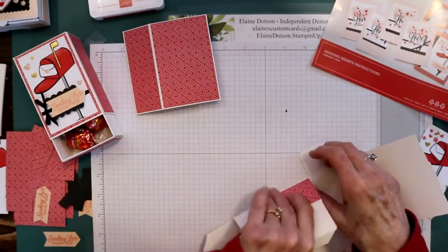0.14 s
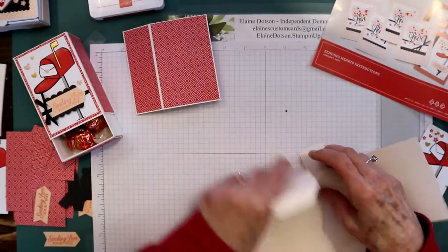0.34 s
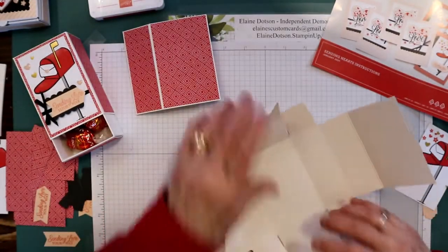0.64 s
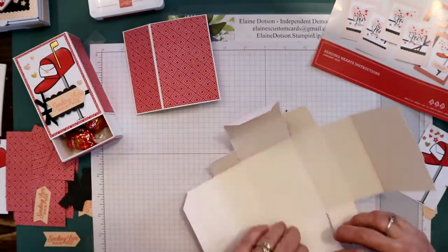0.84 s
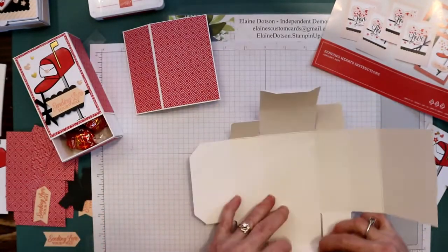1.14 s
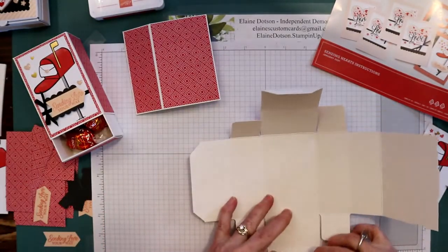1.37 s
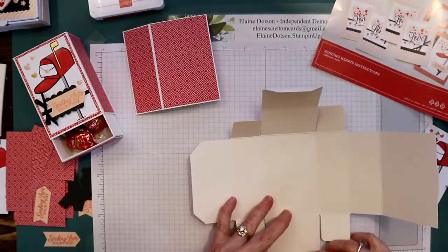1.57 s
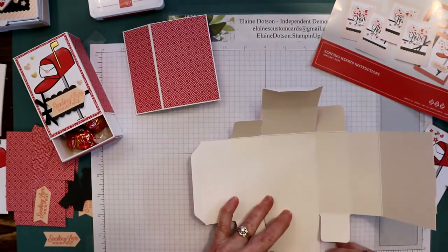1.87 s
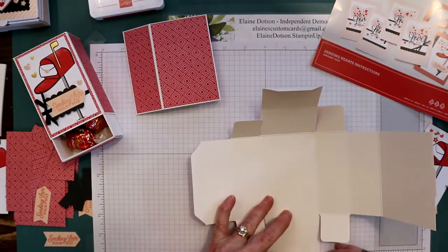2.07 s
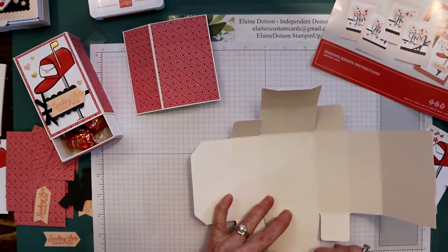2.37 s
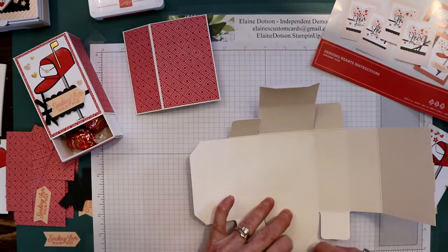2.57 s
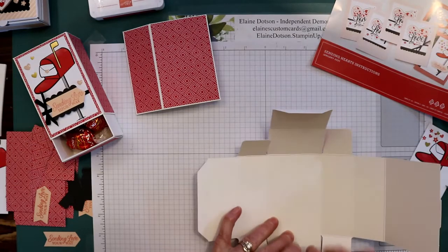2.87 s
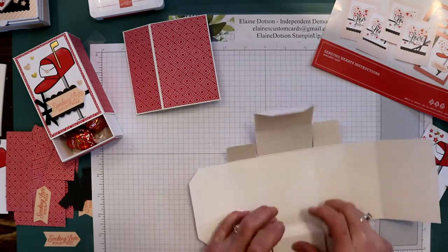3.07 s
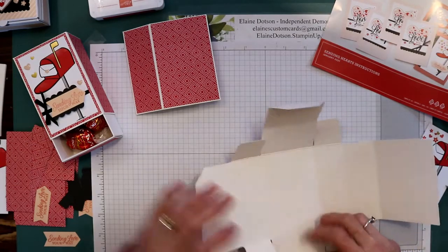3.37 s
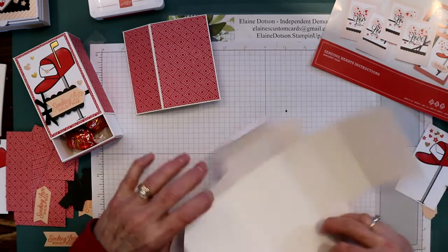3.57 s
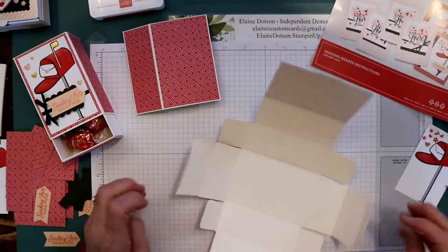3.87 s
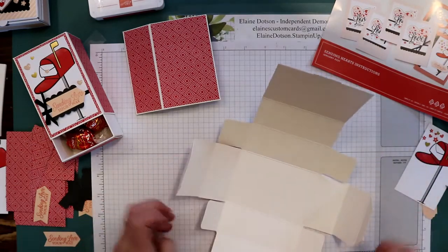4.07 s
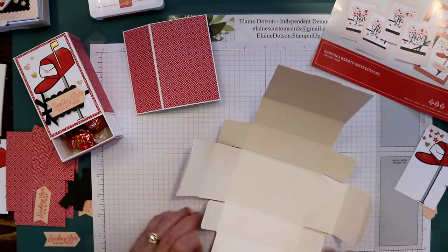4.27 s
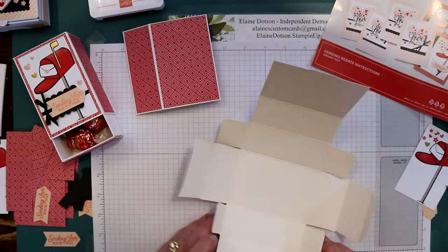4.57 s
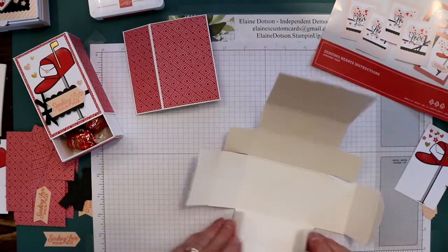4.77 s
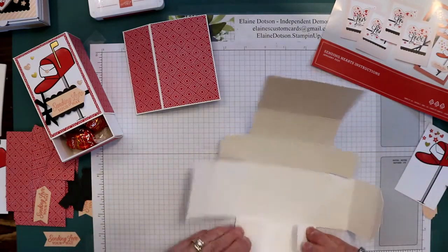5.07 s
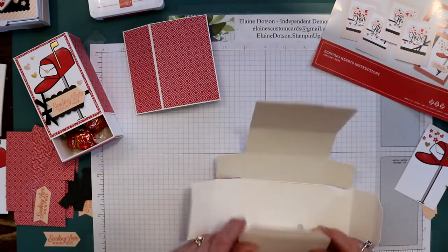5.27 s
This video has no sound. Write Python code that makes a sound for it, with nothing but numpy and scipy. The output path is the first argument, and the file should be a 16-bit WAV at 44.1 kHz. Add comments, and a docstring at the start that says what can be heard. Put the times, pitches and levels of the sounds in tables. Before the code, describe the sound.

A creased sheet of stiff card is moved on a work mat, heard close and nearly mono in a small, quiet room with faint air, hum and hiss. At 0.1 seconds a short rustle, pat and low puff of air open the scene, followed by faint brushing to 0.5. Between 0.8 and 1.25 the card slides and turns, with dry clicks and a clear tap at 1.2. Soft flutters and rubs follow, then mostly stillness, with a tiny brush near 1.95 and a faint tap at 2.4. From 2.6 activity thickens: a bright click at 2.73, scrapes and crease pops, then the loudest sharp snap at 3.07. More scraping and clicks at 3.25 to 3.45 lead to a firm, dull slap with edge scrape at 3.6. A tiny high squeaking tick comes at 4.17. Light taps and gentle sliding return from 4.77 to the end, around 5.4.

```python
"""A creased sheet of cardstock hisses as it is slid, unfolded and turned on a work mat in a small room.
Fibre slips make the hiss and crackle; creases snap and flaps tap as clicks with fluttering bending waves;
panels pat down as filtered noise, edges scrape as noisy slips and squeak as short unsteady tones.
Panels push low swinging puffs of air and the desk rumbles under the arm. Short reflections,
quiet air, hum and faint stereo hiss surround a close, nearly mono pickup."""
import sys
import numpy as np
from scipy import signal
from scipy.fft import rfft, irfft
from scipy.io import wavfile
from scipy.ndimage import uniform_filter1d

SR = 44100
rng = np.random.default_rng(int(sys.argv[2]) if len(sys.argv) > 2 else 0)


def generate_wav(signal):
    """Clip the signal to [-1, 1] and save it as 16-bit WAV at the path in sys.argv[1]."""
    frames = np.transpose(np.atleast_2d(signal))
    scaled = np.clip(frames, -1, 1) * 32767
    pcm = np.round(scaled).astype(np.int16)
    wavfile.write(sys.argv[1], SR, pcm)


N = 239446
TIME = np.arange(N) / SR
BINS = np.fft.rfftfreq(2048, 1 / SR) + 1  # Hz, offset to keep logs finite

# pushes of the sheet over the mat: (time of greatest speed [s], hiss level before slide gain [dB],
# sheet rise [s], sheet fall [s], arm rumble level [dB])
STROKES = [(.095, -46.5, 0.039, 0.065, -54), (.26, -56, 0.031, 0.051, -56), (.45, -56, 0.13, .095, -67.5),
           (.98, -52.5, 0.092, 0.097, -59), (1.17, -58.5, 0.052, 0.058, -71),
           (1.41, -53.5, .036, 0.041, -66), (1.65, -60.5, 0.025, 0.042, -57),
           (1.962, -49.5, 0.011, 0.019, -67), (2.435, -56, 0.063, .035, -54.5),
           (2.625, -52, 0.024, 0.057, -56), (2.69, -48.5, 0.053, .055, -63),
           (2.985, -47, 0.034, .07, -51.5), (3.255, -53.5, .022, .045, -61), (3.45, -49, 0.037, 0.049, -59),
           (3.61, -55, .08, .15, -64), (4.82, -65, .04, 0.085, -60), (5.135, -51, 0.13, 0.073, -64),
           (5.28, -60, 0.034, 0.043, -57), (5.42, -62, 0.034, .05, -56)]
STROKE_SHAPE = 1.07  # 1 = pointed swell of speed, 2 = rounded


def amp(db):
    """Decibels to gain."""
    return 10 ** (np.asarray(db) / 20)


def evened(x):
    """Scales to rms 1."""
    return x / np.sqrt(np.mean(x ** 2) + 1e-20)


def read(points, hz):
    """Interpolates a table on a log-frequency axis."""
    f, value = np.transpose(points)
    return np.interp(np.log(hz + 1), np.log(f + 1), value)


def add(mix, s, sound):
    """Mixes a sound in at time s."""
    part = mix[max(round(s * SR), 0):][:len(sound)]
    part += sound[:len(part)]


def coloured(x, points):
    """Gives an N-sample signal a spectrum, at rms 1."""
    gain = amp(read(points, np.fft.rfftfreq(N, 1 / SR)))
    return evened(irfft(rfft(x) * gain, N))


def smoothed_noise(shape, *passes):
    """Gaussian noise at rms 1 after moving averages, each given as (size, axis)."""
    x = rng.standard_normal(shape)
    for size, axis in passes:
        x = uniform_filter1d(x, size=size, axis=axis)
    return evened(x)


def swell(t, rise_s, fall_s, shape):
    """Grows to 1 at t = 0 and dies away; rise and fall are 1/e times."""
    return np.exp(-abs(t / np.where(t < 0, rise_s, fall_s)) ** shape)


def ring(db):
    """Minimum-phase impulse response of energy 1 with the given dB shape on BINS."""
    log_gain = np.log(amp(np.r_[db, db[-2:0:-1]]))
    response = np.fft.ifft(np.exp(np.conj(signal.hilbert(log_gain)))).real[:len(BINS)]
    return response / np.linalg.norm(response)


def card(centre_hz, focus_db, baffle=0.33):
    """Card resonances in dB under a hump set by the moving part; small parts radiate little bass."""
    # card resonances: (freq [Hz], width [Hz], level [dB])
    resonances = [(425, 94, 5), (663, 200, 7.5), (995, 120, 6.5), (1280, 61, 3), (1650, 330, 1.5),
                  (2280, 800, 3.5), (3180, 82, 2.5), (5200, 610, 2), (5750, 99, 5), (7630, 460, 5.5)]
    modes = sum(db / (1 + (2 * (BINS - hz) / width_hz) ** 2) for hz, width_hz, db in resonances)
    leak = -10 * np.log10(1 + (baffle * centre_hz / (BINS + 50)) ** 4)
    hump = -focus_db * (np.hypot(1, np.log2(BINS / centre_hz)) - 1)
    return modes + leak + hump


def fibres(size, per_s, spread_db, smooth):
    """Tiny slips of unequal size over a smooth rub, at rms 1."""
    sizes = amp(spread_db * np.minimum(rng.exponential(1, size), 4))
    slips = (rng.random(size) < per_s / SR) * sizes
    signed = evened(slips * rng.choice([-1, 1], size))
    return evened(signed + smooth * rng.standard_normal(size))


def shifting(x, patch_db):
    """As the contact moves, narrow bands of the sheet swell and fade."""
    z = signal.stft(x, nperseg=512, noverlap=384)[2]
    patches = smoothed_noise(z.shape, (4, 0), (9, 1))
    return evened(signal.istft(z * amp(patch_db * patches), nperseg=512, noverlap=384)[1][:N])


def background(quiet_db=-64.5, hum_hz=122, hum_db=-86, side_db=-71):
    """Room air, a faint hum and microphone hiss: coloured noise and a sine, as mid and side."""
    # mid noise spectrum: (freq [Hz], relative level [dB])
    air_points = [(12, -10), (22, 2.5), (42, -3), (85, 2), (160, -2.5), (350, -3), (800, -8), (1500, -10),
                  (3200, -12.5), (8000, -15), (16000, -16)]
    # spectrum of the hiss that differs between the ears: (freq [Hz], relative level [dB])
    side_points = [(12, -45), (20, -21), (63, -9.5), (542, 3.5), (642, 2), (1190, -4), (11400, -2.5),
                   (16000, -0.5)]
    mid, side = rng.standard_normal((2, N))
    hum = amp(hum_db) * np.sin(2 * np.pi * hum_hz * TIME)
    return amp(quiet_db) * coloured(mid, air_points) + hum, amp(side_db) * coloured(side, side_points)


def room(x, delay_s=0.0033):
    """Sparse reflections from desk and walls, each band dying at its own speed."""
    # decay by band: (freq [Hz], t60 [s])
    decay_points = [(100, 0.77), (400, 0.072), (1000, 0.22), (3500, 0.26), (8000, 0.22), (15000, 0.33)]
    size = SR // 2
    hits = rng.choice([-1., 1.], size) * (rng.random(size) < 4000 / SR)
    taps = hits * (np.arange(size) / SR > delay_s)
    hz, t, z = signal.stft(taps, SR, nperseg=256)
    decay = amp(-60 * t / read(decay_points, hz)[:, None])
    tail = signal.istft(z * decay, SR, nperseg=256)[1]
    return signal.fftconvolve(x, tail / np.linalg.norm(tail))[:N]


def hands(arm_stretch=1.82):
    """The desk rumbles under the arm, whose moves last arm_stretch times longer than the sheet's."""
    # rumble spectrum: (freq [Hz], relative level [dB])
    rumble_points = [(20, 0.0), (45, -15), (72, 6.5), (110, -9.5), (170, -7.0), (350, -20.5), (2000, -37)]
    rumble = coloured(rng.standard_normal(N), rumble_points)
    moves = [amp(db) * swell((TIME - s) / arm_stretch, rise_s, fall_s, STROKE_SHAPE)
             for s, _, rise_s, fall_s, db in STROKES]
    return np.linalg.norm(moves, axis=0) * rumble


def puffs(sag=0.18, wobble=0.17, flex_hz=165, flex_db=-11, damping=0.62):
    """A panel swings unevenly for a few cycles, slowing as it settles, and flexes in a second mode."""
    # air pushed by a swinging panel: (start [s], swing level before fades [dB], mean freq [Hz], length [s])
    swings = [(.081, -35.5, 78, 0.06), (.923, -52, 65, 0.07), (.987, -36.5, 82, 0.058),
              (1.428, -50, 109, 0.078), (1.484, -43.5, 161, 0.033), (1.543, -44.5, 164, .029),
              (1.574, -47.5, 170, 0.034), (2.6, -47, 73.6, 0.07), (2.726, -38, 100, .053),
              (3.014, -41, 73, .055), (3.049, -36.5, 96, 0.0337), (3.079, -44.5, 116, 0.052),
              (3.375, -38.5, 79, 0.062), (3.61, -40, 79, 0.049)]
    out = np.zeros(N)
    for s, db, hz, length_s in swings:
        u = np.arange(0, 1, 1 / (length_s * SR))
        unsteady = 1 + wobble * smoothed_noise(len(u), (200, 0))
        angle = 2 * np.pi * np.cumsum(unsteady + sag * (.5 - u)) / SR
        flex = amp(flex_db) * np.sin(flex_hz * angle + 2 * np.pi * rng.random())
        fade = signal.windows.tukey(len(u), .5) * np.exp(-damping * u)
        add(out, s, amp(db) * (flex - np.sin(hz * angle)) * fade)
    return out


def squeaks(glide=0.092, jitter=0.048, rough=0.11):
    """An edge catches and lets go at a nearly regular, falling rate for a few milliseconds."""
    # stick-slip squeaks: (start [s], tone peak level [dB], mean freq [Hz], length [s])
    slips = [(2.975, -31.5, 1830, 0.006), (2.995, -39, 4900, 0.0087), (3.242, -42, 1330, 0.01),
             (4.1628, -25, 4250, 0.0069), (4.18, -29.5, 3740, 0.0057)]
    out = np.zeros(N)
    for s, db, hz, length_s in slips:
        u = np.arange(0, 1, 1 / (length_s * SR))
        unsteady = smoothed_noise(len(u), (12, 0))
        turns = np.cumsum(hz * (1 + glide * (.5 - u) + jitter * unsteady)) / SR
        tone = np.sin(2 * np.pi * turns) + rough * rng.standard_normal(len(u))
        add(out, s, amp(db) * np.sin(np.pi * u) ** 2 * tone)
    return out


def scrapes(focus_db=10.5, ripple_db=3.0, edge_db=6, edge_octaves=0.28, gain_db=-1):
    """Uneven slips of an edge swell, fade and chatter on, ringing the flap that carries it."""
    # edge dragged or flicked over mat or flap:
    # (time of strongest drag [s], level before gain_db [dB], fall [s], edge pitch [Hz])
    drags = [(.077, -52, 0.0073, 1320), (.105, -65, 0.043, 540), (.366, -57, .004, 850),
             (.43, -60, .055, 8000), (.465, -55, .004, 900), (.855, -58.5, 0.037, 1350),
             (1.091, -54.5, 0.0077, 4270), (1.227, -52, 0.033, 1170), (1.39, -61, 0.04, 1350),
             (1.655, -60.5, 0.024, 860), (1.962, -54, .014, 840), (2.743, -43, 0.018, 1080),
             (2.953, -47.5, .028, 880), (2.978, -46.5, .016, 1830), (2.998, -44, .013, 1000),
             (3.0718, -28.5, .0012, 1100), (3.089, -47.5, .017, 1700), (3.169, -55, .006, 1330),
             (3.267, -41.5, .02, 1330), (3.448, -45, 0.025, 1100), (3.607, -30.5, .004, 730),
             (3.6066, -27.5, .002, 2400), (3.701, -52, 0.021, 2550), (4.1637, -36.5, 0.00095, 8700),
             (4.171, -44.5, 0.0045, 2750), (4.182, -45, 0.0037, 2500), (4.308, -61, .011, 2620),
             (4.819, -55, .005, 1800), (5.086, -56, .003, 1900), (5.105, -57.5, .02, 983),
             (5.27, -63, 0.18, 1950), (5.291, -53, .008, 980)]
    rise_share = .7  # rise time / fall time
    chatter_db, chatter_lag_s, chatter_s = -14.5, .017, 0.011
    out = np.zeros(N)
    for s, db, fall_s, hz in drags:
        rise_s = rise_share * fall_s
        start = max(s - 3 * rise_s, 0)
        t = np.arange(start - s, chatter_lag_s + 3 * max(fall_s, chatter_s), 1 / SR)
        edge = edge_db * np.exp(-(np.log2(BINS / hz) / edge_octaves) ** 2)
        # each grip shifts the fine peaks of the flap
        grip = smoothed_noise(len(BINS), (4, 0), (4, 0))
        body = ring(card(hz, focus_db) + edge + ripple_db * grip)
        chatter = amp(chatter_db) * swell(t - chatter_lag_s, rise_share * chatter_s, chatter_s, 1.5)
        drag = np.hypot(swell(t, rise_s, fall_s, 2.05), chatter)
        slips = fibres(len(t), per_s=1100, spread_db=2.5, smooth=0.46)
        rasp = drag * signal.fftconvolve(slips, body)[:len(t)]
        add(out, start, amp(db + gain_db) * rasp * np.linalg.norm(drag) / np.linalg.norm(rasp))
    return out


def slaps(rise_s=0.00054, settle_share=.2, settle_s=0.025):
    """Dull, dying pats of card on the mat; the rest of the panel settles in a second decay."""
    # panel landing flat: (start [s], level [dB], main decay [s])
    landings = [(.075, -43.5, 0.026), (.522, -57, 0.016), (.857, -48.5, 0.017), (1.037, -47, .0043),
                (1.197, -48, 0.0032), (1.64, -58.5, 0.024), (2.43, -60.5, 0.058), (2.704, -45.5, 0.016),
                (2.727, -40, 0.018), (2.937, -45.5, 0.014), (3.6035, -29, .007), (3.705, -54, .015),
                (4.165, -47, 0.0078), (4.794, -55.5, .058), (5.286, -54, .04)]
    # pat spectrum: (freq [Hz], relative level [dB])
    pat_points = [(60, -26), (130, -5.5), (330, -1.5), (500, 0.5), (720, -3.5), (1100, -12.5), (2400, -21),
                  (5000, -22), (15000, -75)]
    out, t = np.zeros(N), np.arange(SR // 5) / SR
    body = ring(read(pat_points, BINS))
    for s, db, decay_s in landings:
        fade = (1 - settle_share) * np.exp(-t / decay_s) + settle_share * np.exp(-t / settle_s)
        push = fade * (1 - np.exp(-t / rise_s))
        pat = signal.fftconvolve(push * rng.standard_normal(len(t)), body)
        add(out, s, amp(db) * pat * np.linalg.norm(push) / np.linalg.norm(pat))
    return out


def snaps(focus_db=3.5, flutter_s=0.0023, flutter_tilt_db=1.0, contact_s=0.00053, smear=0.34,
          soft_hz=6300, onset_s=.0015, gain_db=-1):
    """A sharp contact, then brighter bending waves that flutter out through the sheet."""
    # creases snapping, flaps tapping: (time before onset_s [s], click peak level before gain_db [dB],
    # centre freq [Hz], tilt [dB/octave], flutter level re contact [dB])
    # onset_s: a short fixed delay before each click
    contacts = [(.011, -32, 850, -1, -2.5), (.074, -30, 4110, 8, -6), (.363, -42.5, 802, -4, -11),
                (.519, -41, 1010, -3.5, 2.5), (.823, -39, 1280, -2, -2), (.862, -37.5, 1550, 2, 1),
                (.982, -33.5, 4210, 3.5, -4), (1.036, -31.5, 972, -.5, -13), (1.195, -24, 1260, -3, -20),
                (1.334, -37, 993, 2, -14), (1.545, -46.5, 2340, -1.5, 4), (2.434, -40, 1030, 12, -2),
                (2.605, -38.5, 1990, 1.5, 5.5), (2.703, -30, 5300, -4, -16), (2.725, -19, 4500, 2.5, -4.5),
                (2.732, -23.5, 1000, 4, -10), (2.921, -34.5, 1270, -2.5, 0), (2.937, -28.5, 960, 3.5, 0),
                (2.961, -33.5, 1240, -8.5, -13), (2.974, -24.5, 1900, 12, -1), (3.07, -10.5, 2500, 0, -4.5),
                (3.265, -33.5, 1230, 12, 8), (3.374, -40.5, 1430, 0.5, 1.5), (3.424, -30, 2370, -2, -2),
                (3.455, -24.5, 1000, -.5, -2), (4.164, -36, 4230, -1.5, -2), (4.769, -35.5, 1750, -3.5, -3),
                (4.814, -43, 886, 1, -8), (5.082, -34, 1100, -3, 1), (5.282, -37, 930, -5.5, -3.5),
                (5.337, -35.5, 1090, -6, -13)]
    out, t = np.zeros(N), np.arange(len(BINS)) / SR
    softness = -10 * np.log10(1 + (BINS / soft_hz) ** 8)
    decays_s = np.array([[contact_s], [flutter_s]])
    for s, db, hz, tilt_db, flutter_db in contacts:
        octaves = np.log2(BINS / hz)
        colour = card(hz, focus_db) + tilt_db * octaves
        click, bending = ring(colour + softness), ring(colour + flutter_tilt_db * octaves)
        grit, flutter = rng.standard_normal((2, len(t))) * t * np.exp(-t / decays_s)
        contact = signal.fftconvolve((t == 0) + smear * grit / np.linalg.norm(grit), click)
        waves = amp(flutter_db) * signal.fftconvolve(flutter / np.linalg.norm(flutter), bending)
        add(out, s + onset_s, amp(db + gain_db) * (contact + waves) / abs(click).max())
    return out


def slide(gain_db=-1.5, creep_db=-73, judder_db=1.0, crackle_db=-10, patch_db=2.5):
    """Fibres hiss over the mat with the sheet's speed; a few catch and crackle in the card."""
    # hiss spectrum before patches: (freq [Hz], relative level [dB])
    hiss_points = [(100, -4), (350, -2), (700, 2), (1500, -3), (2800, -2), (4200, 0.5), (6000, -4),
                   (9000, -3.5), (13000, -8), (16000, -15)]
    judder = smoothed_noise(N, (400, 0))
    pushes = [amp(db) * swell(TIME - s, rise_s, fall_s, STROKE_SHAPE)
              for s, db, rise_s, fall_s, _ in STROKES]
    # creep: hiss of the held sheet between pushes, before gain_db
    speed = amp(gain_db) * np.hypot(np.linalg.norm(pushes, axis=0), amp(creep_db))
    rub = coloured(fibres(N, per_s=4000, spread_db=2.5, smooth=0.88), hiss_points)
    hiss = shifting(rub, patch_db) * amp(judder_db * judder)
    catches = fibres(N, per_s=120, spread_db=3.5, smooth=0.033)
    crackle = evened(signal.fftconvolve(catches, ring(card(1560, focus_db=1.0)))[:N])
    return speed * (hiss + amp(crackle_db) * crackle)


def scene(room_db=-7, puff_room_db=-15, squeak_room_db=-9):
    """The card and its room sit in the centre; only the background hiss has width."""
    paper = snaps() + slaps() + slide() + scrapes()
    air, squeak = puffs(), squeaks()
    quiet, side = background()
    echo = room(amp(room_db) * paper + amp(puff_room_db) * air + amp(squeak_room_db) * squeak)
    mid = paper + air + squeak + echo + hands() + quiet
    return np.array([mid + side, mid - side])


def record(dry, edge_hz=15950):
    """Band limit of the recorder: a linear-phase lowpass."""
    lowpass = signal.firwin(511, edge_hz, window=("kaiser", 9), fs=SR)
    return signal.oaconvolve(dry, lowpass[None], "same")


dry = scene()
out = record(dry)
generate_wav(out)
```